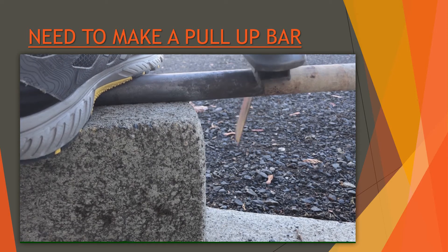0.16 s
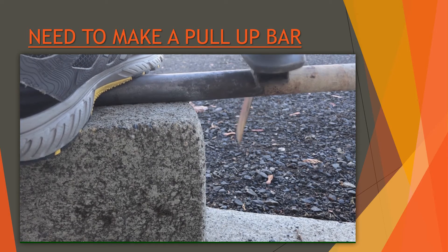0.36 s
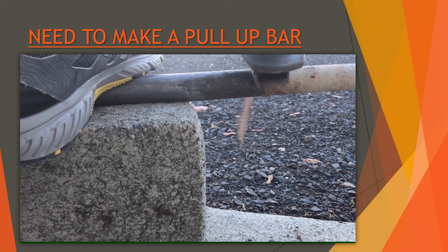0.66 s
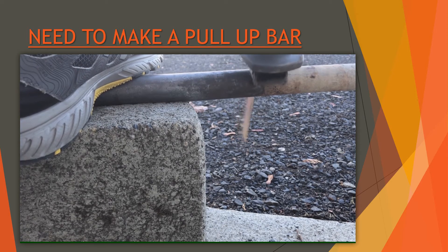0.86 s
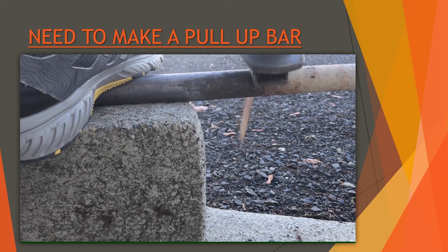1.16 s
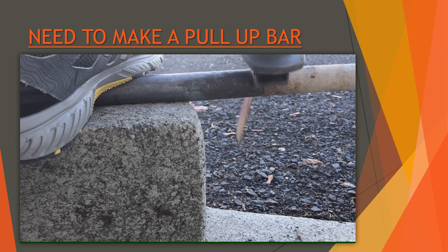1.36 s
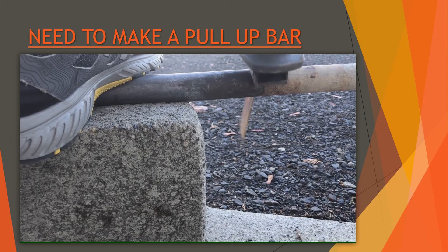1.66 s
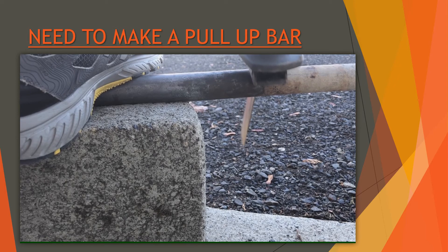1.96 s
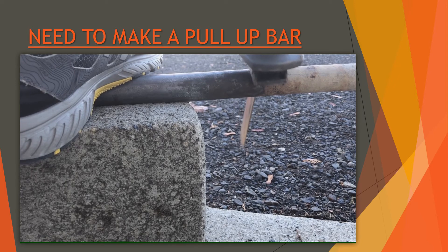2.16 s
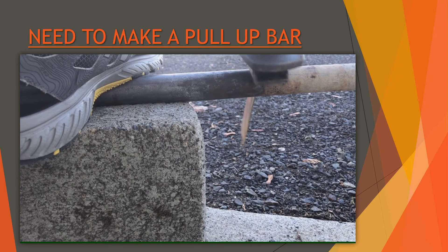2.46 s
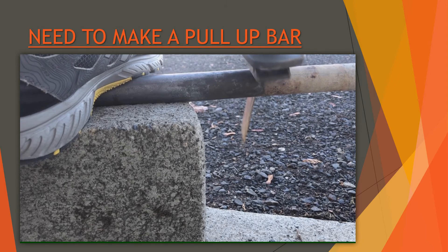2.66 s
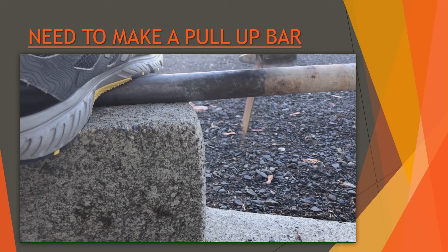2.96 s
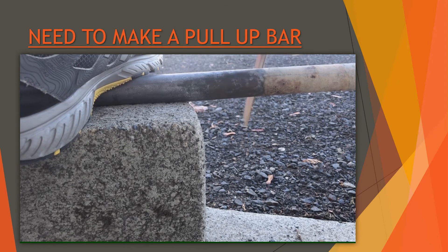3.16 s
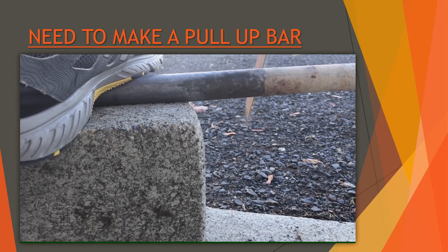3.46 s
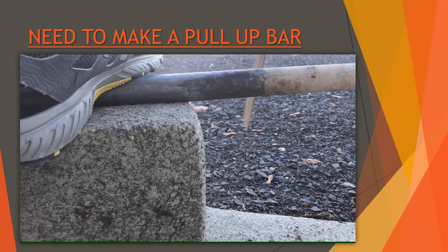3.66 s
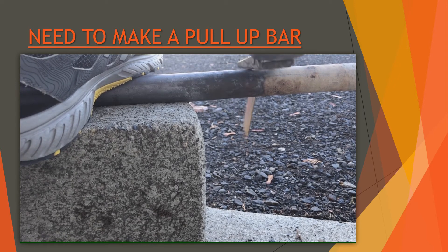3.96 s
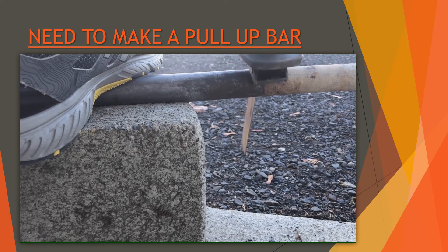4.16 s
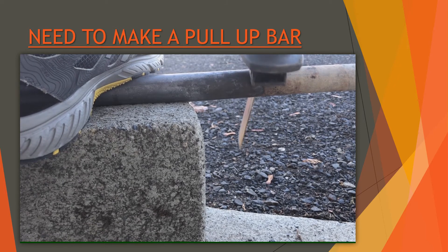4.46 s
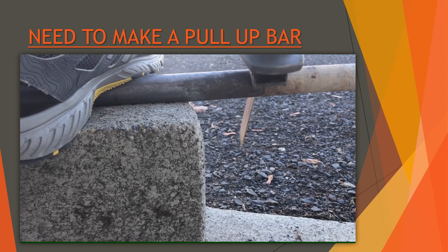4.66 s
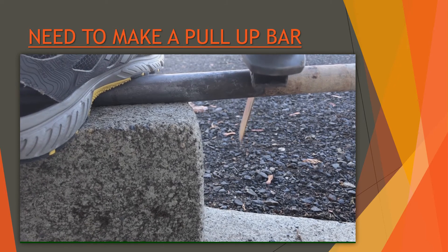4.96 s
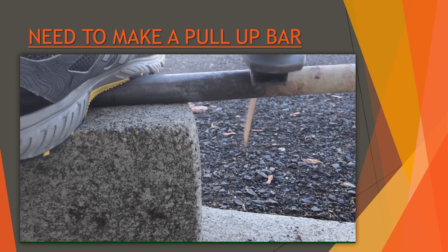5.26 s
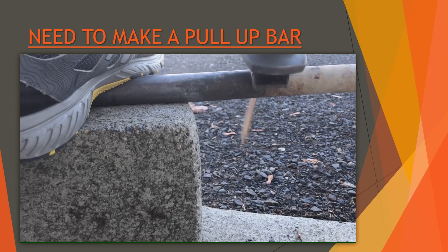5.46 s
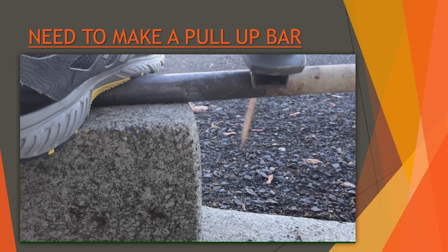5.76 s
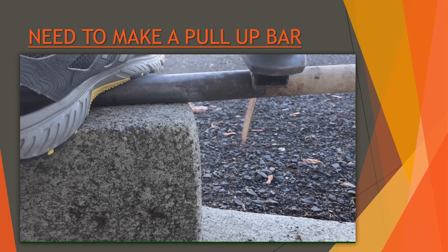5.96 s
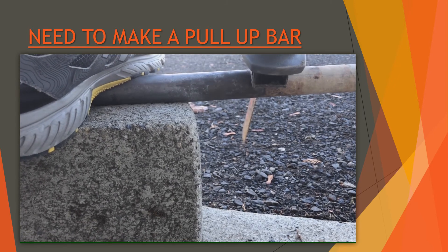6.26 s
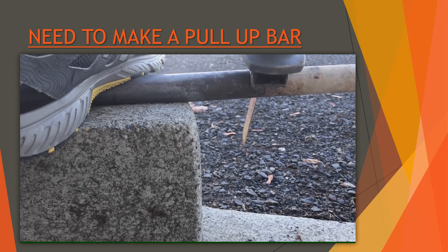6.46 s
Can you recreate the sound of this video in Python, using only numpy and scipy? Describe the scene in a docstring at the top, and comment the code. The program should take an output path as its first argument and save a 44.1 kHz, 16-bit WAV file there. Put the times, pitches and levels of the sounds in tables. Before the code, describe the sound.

A reciprocating saw rasps and clatters through a steel pipe outdoors, squealing at moments, then stops with a few light ticks.

```python
"""Outdoors, a reciprocating saw starts up on a steel pipe held down by a foot on a concrete block.
At about thirty strokes a second its teeth rasp, the drive and shoe clack, and the pipe wall rings.
At moments the noise thins to a few pure tones; now and then the blade squeals, or catches and slams
the shoe on the pipe. It bucks harder as it slows, then stops with a few last ticks.
Small handling rustles and knocks follow, with one clink of the blade on the pipe."""
import sys
import numpy as np
from scipy import signal
from scipy.fft import rfft, irfft
from scipy.io import wavfile
from scipy.ndimage import uniform_filter1d

SR = 44100
rng = np.random.default_rng(int(sys.argv[2]) if len(sys.argv) > 2 else 0)


def wav_record(signal):
    """Record a signal, one row per channel, as 16-bit PCM in the file named by sys.argv[1]."""
    frames = np.transpose(np.atleast_2d(signal))
    bounded = np.clip(frames, -1, 1)
    # unit amplitude maps onto the largest positive 16-bit level
    quanta = np.round(bounded * 32767).astype(np.int16)
    wavfile.write(sys.argv[1], SR, quanta)


N = 291501
TIME = np.arange(N) / SR
FREE_SPEED, WORKING_SPEED = 29.8, 16.2   # strokes per s: the blade bucks below one, weakens below the other


def from_db(db):
    """Decibels to gain."""
    return 10 ** (np.asarray(db) / 20)


def automation(rows):
    """Each column of a breakpoint curve at every sample."""
    times, *columns = np.transpose(rows)
    return [np.interp(TIME, times, column) for column in columns]


def levelled(x, window=6000):
    """Ride the running rms toward 1, leaving the single strokes alone."""
    power = np.maximum(uniform_filter1d(x * x, window), 0)
    return x / np.sqrt(power + 0.00089 * np.mean(x * x))


def eq(x, curve, size=8192):
    """Minimum-phase filter that follows an EQ curve."""
    hz, db = np.transpose(curve)
    grid = np.maximum(np.fft.rfftfreq(size, 1 / SR), 1)
    cepstrum = irfft(np.log(from_db(np.interp(np.log(grid), np.log(hz), db))))
    cepstrum[1:size // 2] *= 2
    cepstrum[size // 2 + 1:] = 0
    return signal.fftconvolve(x, irfft(np.exp(rfft(cepstrum))))[:N]


def resonance(x, hz, width_hz):
    """Two-pole band-pass with unity gain at its peak."""
    r = np.exp(-np.pi * width_hz / SR)
    poles = [1, -2 * r * np.cos(2 * np.pi * hz / SR), r * r]
    return signal.lfilter(np.array([1, 0, -1]) * (1 - r * r) / 2, poles, x)


def clicks(times, gains):
    """One impulse at each time."""
    return np.bincount(np.clip(np.ravel(times) * SR, 0, N - 1).astype(int), np.ravel(gains), N)


def crunch(hits, decay_s):
    """Each hit becomes a dying burst of tiny contacts."""
    envelope = signal.lfilter([1], [1, -np.exp(-1 / (decay_s * SR))], hits + 1e-18)
    return envelope * rng.standard_normal(N)


def wander(per_s):
    """Slow random modulation with a spread of about 1."""
    knots = np.clip(rng.standard_normal(int(TIME[-1] * per_s) + 2), -2, 2)
    return np.interp(TIME * per_s, np.arange(len(knots)), knots) * np.sqrt(3 / 2)


def swell(centre_s, length_s, db):
    """Bell-shaped fade in and out."""
    return from_db(db) * np.exp(-np.minimum(2 * np.abs(TIME - centre_s) / length_s, 10) ** 2)


# Tone of the open air: freq_hz, gain_db
AIR_EQ = [(25, -18), (55, -7), (110, -1.5), (400, -16), (1200, -21), (3000, -27), (6000, -31), (15500, -37)]
def outdoor_air():
    """A faint, steady bed of low noise."""
    return from_db(-66) * levelled(eq(rng.standard_normal(N), AIR_EQ))


def bite(stroke, speed, accent_db, centre, rise_s, fall_s):
    """Blade pressure: the teeth catch abruptly, pull through the steel, and slide lightly back."""
    offset_s = ((stroke - centre + .5) % 1 - .5) / speed
    pull = np.where(offset_s < 0, np.exp(-(offset_s / rise_s) ** 4), np.exp(-(offset_s / fall_s) ** 2))
    depth_db = accent_db + 1.5 * np.sqrt(np.maximum(FREE_SPEED - speed, 0))   # bucks harder when slow
    return from_db(depth_db * (pull - 1))


# Hits of drive and shoe in each stroke, from mid-cut: offset_strokes, clack_db, thump_db
STROKE_HITS = [(-.39, 5, -8.5), (-.18, -8.5, 1), (-.07, -1.5, -17), (.14, -3.5, -5), (0.329, -0.5, -1.5)]
def contacts(stroke, layer, spread_db, jitter=.02):
    """The same contacts come round in each stroke, never quite alike in time or strength."""
    offsets, clack_db, thump_db = np.transpose(STROKE_HITS)
    levels_db = {"clack": clack_db, "thump": thump_db}[layer]
    counts = np.arange(int(stroke[-1]) + 1)[:, None]
    chance = rng.standard_normal((len(counts), 2, len(offsets)))
    places = counts + offsets + jitter * chance[:, 0]
    inside = (places > stroke[0]) & (places < stroke[-1])
    return clicks(np.interp(places, stroke, TIME), inside * from_db(levels_db + spread_db * chance[:, 1]))


def scraping(per_s, size_db, judder_hz, judder_db):
    """Tiny catches of uneven size, coming in clumps as the surfaces judder."""
    sizes = from_db(size_db * np.minimum(rng.exponential(1, N), 4)) * rng.choice([-1, 1], N)
    grains = sizes * (rng.random(N) < per_s / SR)
    judder = resonance(rng.standard_normal(N), judder_hz, judder_hz)
    return grains * from_db(judder_db * np.clip(judder / judder.std(), -2, 2))


# Tone of teeth on steel: freq_hz, gain_db
RASP_EQ = [(400, -36.5), (900, 4), (2000, -1), (2450, 3.5), (2800, 2), (3700, 0.5), (5000, 2), (6200, -1),
           (7300, 0), (8600, 0.5), (10100, -4), (11300, -3.5), (13300, -7.5), (15800, -11.5)]
# The blade's peaks and notches: freq_hz, width_hz, gain_db
BLADE_BANDS = [(3220, 130, -4), (3370, 40, 6), (3700, 220, -3), (3900, 60, 4), (4170, 160, -3),
               (4440, 36, 2.5), (5020, 60, 2), (5300, 170, -7), (5635, 30, 3.5), (5800, 100, -3),
               (6020, 80, 4), (6240, 60, 3), (6720, 60, 3), (7350, 500, -3), (7925, 44, 7), (8080, 100, -4),
               (8850, 80, 2), (9300, 80, 3), (10400, 260, -4), (11000, 90, 3), (11780, 110, 3.5),
               (12380, 160, 3.5)]
def tooth_rasp(grip, scrape, blows):
    """The blows of the drive ride on the scraping teeth, and the blade colours both."""
    rasp = eq(grip * (scrape + from_db(-17) * blows), RASP_EQ)
    for hz, width_hz, db in BLADE_BANDS:
        rasp = rasp + (from_db(db) - 1) * resonance(rasp, hz, width_hz)
    return levelled(rasp)


# Tone of the clacking drive and shoe: freq_hz, gain_db
CLACK_EQ = [(200, -36), (400, -23), (560, -12.5), (670, -1), (800, -2), (1060, 3), (1270, 5.5), (1450, 1),
            (1700, -4), (2100, -0.5), (2500, -14), (4000, -10), (10000, -54)]
def drive_clatter(pressure, blows):
    """Drive and shoe clack and rattle, hardest on the pull."""
    rattle = levelled(scraping(per_s=9000, size_db=2.5, judder_hz=220, judder_db=3))
    return levelled(eq(pressure * (blows + rattle), CLACK_EQ))


def tooth_strikes(stroke, offset=-.09, scatter=.03, level_db=27, spread_db=1.5):
    """The first tooth of each pull strikes the wall, pushing or pulling it."""
    counts = np.arange(1, int(stroke[-1]))
    timing, force, side = rng.standard_normal((len(counts), 3)).T
    times = np.interp(counts + offset + scatter * timing, stroke, TIME)
    return clicks(times, np.sign(side) * from_db(level_db + spread_db * force))


# Modes of pipe wall and blade under the teeth: pitch_hz, width_hz, level_db, lag_strokes
PIPE_MODES = [(483, 42, -6, .35), (930, 26, 3, 0), (1075, 45, 2, .05), (1170, 45, -1.5, 0),
              (1285, 32, 5, 0), (1807, 28, .5, .14), (2030, 70, -3.5, .2), (2210, 90, -5.5, .15),
              (2450, 50, -14, .1), (2755, 100, -10, 0), (2965, 100, -4, 0), (3070, 80, -8, 0),
              (3378, 38, 1, -.04), (3440, 60, -8, -.04), (4435, 30, -10, 0), (5150, 50, -13, 0),
              (5630, 28, -5, 0), (6035, 90, -12, 0), (6879, 26, -9.5, 0), (7935, 36, -11, 0),
              (8520, 60, -15, 0), (9270, 60, -17, 0), (10714, 60, -15, 0), (11000, 60, -16, 0),
              (12300, 80, -19, 0)]
def pipe_ring(stroke, pressure, scrape, detune=.002, flare_db=2.4, flares_per_s=9, attack_s=.0005):
    """Struck and rubbed modes flare, fade and bend in pitch as the teeth move round the wall."""
    ring = 0
    attack = np.exp(-1 / (attack_s * SR))
    for hz, width_hz, db, lag in PIPE_MODES:
        drive = np.interp(stroke - lag, stroke, pressure) * scrape + tooth_strikes(stroke - lag)
        phase = 2 * np.pi * hz * np.cumsum(1 + detune * wander(flares_per_s)) / SR
        carrier = np.exp(1j * phase)
        decay = np.exp(-np.pi * width_hz / SR)
        poles = [1, -decay - attack, decay * attack]
        envelope = signal.lfilter([(1 - decay) * (1 - attack)], poles, drive * carrier.conj())
        ring = ring + from_db(db + flare_db * wander(flares_per_s)) * (carrier * envelope).real
    return levelled(ring)


# Tone of the ram's jolts: freq_hz, gain_db
THUMP_EQ = [(25, -47.5), (55, -27.5), (110, -17.5), (130, -26), (150, -4.5), (190, -6), (260, 1),
            (350, -1.5), (480, 4.5), (700, -4), (1200, -28.5), (4000, -47.5)]
def ram_thump(stroke):
    """The heavy ram jolts the saw, most where it turns round."""
    jolts = crunch(contacts(stroke, "thump", spread_db=5), decay_s=.0097)
    return levelled(eq(jolts, THUMP_EQ))


# Hum of the saw body: stroke_harmonic, level_db
SHAKE_HARMONICS = [(2, -65), (3, -57), (4, -59), (5, -48.5), (7, -58)]
def body_shake(stroke, speed):
    """The body shakes at multiples of the stroke rate, harder at speed."""
    hum = sum(np.sqrt(2) * from_db(db) * np.sin(2 * np.pi * (harmonic * stroke + rng.random()))
              for harmonic, db in SHAKE_HARMONICS)
    return speed / FREE_SPEED * hum


# Resonances of the shoe on the pipe: pitch_hz, width_hz, level_db
SHOE_MODES = [(152.8, 6, 6), (233, 140, -5.5), (658, 82, 1), (769, 68, 2), (1567, 270, 1)]
def shoe_rub(pressure, low_cut_hz=125):
    """The shoe rubs on the pipe all through the stroke; it is too small to radiate deep bass."""
    highpass = signal.butter(4, low_cut_hz, "high", fs=SR, output="sos")
    rub = signal.sosfilt(highpass, pressure ** 1.1 * rng.standard_normal(N))
    return levelled(sum(from_db(db) * resonance(rub, hz, width_hz) for hz, width_hz, db in SHOE_MODES))


def motor_gate(release_s, fall_db_per_s, start_s=.0045):
    """Opens as the motor starts, holds, and dies away after the release."""
    return (TIME > start_s) * from_db(-fall_db_per_s * np.clip(TIME - release_s, 0, .5))


# Motor speed, sagging as the blade binds: time_s, strokes_per_s
MOTOR_SPEED = [(0.0, 8.3), (0.19, 14.38), (0.33, 32.75), (0.89, 34.26), (0.99, 32.95), (1.71, 30.35),
               (1.99, 31.51), (2.33, 28.09), (2.48, 30.73), (2.66, 28.77), (2.83, 30.91), (4.04, 32.62),
               (4.41, 28.65), (4.61, 29.73), (5.18, 24.2), (5.33, 28.3), (5.65, 28.95), (5.8, 13.09)]
# Fader moves through the cut: time_s, clatter_db, rasp_db, shoe_db, ring_db, pull_accent_db
CUT_MIX = [(.3, -19.5, -18, -29, -20.5, 6.5), (.85, -20.5, -16, -45.5, -19, 5.5),
           (1.8, -18, -17, -30, -21.5, 6), (2.3, -19, -18.5, -35, -20.5, 6),
           (2.85, -21, -19, -34.5, -19, 7.5), (3.3, -19, -19.5, -44, -20.5, 5),
           (3.75, -20.5, -21, -43.5, -24, 4.5), (4.1, -21.5, -19.5, -37.5, -26, 4.5),
           (4.45, -19.5, -19, -27.5, -25.5, 5), (4.85, -16, -19.5, -28, -30, 6),
           (5.35, -19.5, -19, -26, -31, 3.5), (5.7, -19.5, -16.5, -21.5, -31, 5)]
def saw():
    """The layers of the cut, all locked to the stroke."""
    speed, = automation(MOTOR_SPEED)
    clatter_db, rasp_db, shoe_db, ring_db, accent_db = automation(CUT_MIX)
    stroke = np.cumsum(speed) / SR + .4   # position, counted in strokes
    slow_octaves = np.maximum(np.log2(WORKING_SPEED / speed), 0)
    pressure = bite(stroke, speed, accent_db, centre=-.06, rise_s=.006, fall_s=.0095)
    # the teeth rasp a little longer than the full pull
    grip = bite(stroke, speed, accent_db, centre=-.05, rise_s=.008, fall_s=.0095) ** .9
    blows = levelled(crunch(contacts(stroke, "clack", spread_db=1.5), decay_s=.0031))
    scrape = levelled(scraping(per_s=16000, size_db=1.5, judder_hz=377, judder_db=3.5))
    rasp = from_db(rasp_db - 9 * slow_octaves) * tooth_rasp(grip, scrape, blows)
    clatter = from_db(clatter_db - 8.5 * slow_octaves) * drive_clatter(pressure, blows)
    ring = from_db(ring_db - 14 * slow_octaves) * pipe_ring(stroke, pressure ** 1.55, scrape)
    thump = from_db(-31 + .94 * (rasp_db - rasp_db.mean()) - 2 * slow_octaves) * ram_thump(stroke)
    steadied_db = .21 * (shoe_db - shoe_db.mean())   # the shoe steadies the body
    shake = from_db(-4 - steadied_db) * body_shake(stroke, speed)
    shoe = from_db(shoe_db) * shoe_rub(pressure)
    # the trigger is let go and the drive runs down; the teeth stop biting a moment later
    running = motor_gate(release_s=5.715, fall_db_per_s=255)
    biting = motor_gate(release_s=5.764, fall_db_per_s=1000)
    cutting = biting * (rasp + squeals(stroke, pressure))
    return running * (clatter + ring + cutting + thump + shoe + shake)


# Tone of the yard's echo: freq_hz, gain_db
YARD_EQ = [(60, -13), (300, -17), (1000, -30), (3000, -24), (5000, -33), (15000, -53.5)]
def yard_echo(x, t60_s=.36, predelay_s=.018):
    """A faint, dull scatter from ground and walls."""
    t = TIME[:SR]
    tail = rng.standard_normal(SR) * from_db(-60 * t / t60_s) * (t > predelay_s)
    return eq(signal.fftconvolve(x, tail / np.linalg.norm(tail))[:N], YARD_EQ)


# Brief thinnings of the noise: centre_s, length_s, depth_db, duck_above_hz, lowest_tone_hz, tone_db
TONAL_DIPS = [(0.101, 0.022, 13, 3996, 2400, -33), (0.3, 0.024, 36, 40, 450, -22),
              (0.382, 0.015, 16, 3800, 1600, -24), (.475, .016, 12, 3600, 2000, -24),
              (1.195, .017, 15, 3500, 2900, -26), (1.704, 0.02, 11, 2090, 1600, -24),
              (2.425, 0.02, 12, 2000, 900, -24), (2.621, 0.024, 38, 40, 850, -21.5),
              (3.008, 0.018, 12, 3000, 2000, -23.5), (3.22, 0.015, 6, 3200, 2500, -26),
              (3.303, 0.017, 12, 2500, 1700, -24), (3.84, .018, 16, 2500, 2200, -24),
              (3.979, .017, 12, 1800, 1800, -26), (4.19, .017, 17, 2300, 1700, -26.5),
              (4.234, 0.018, 18, 1400, 1400, -26.5), (4.491, .015, 10, 3500, 3000, -25),
              (4.68, 0.018, 10, 3000, 2200, -23.5), (4.854, 0.023, 38, 40, 850, -19.5),
              (4.912, 0.017, 8, 3500, 2500, -25), (5.069, 0.016, 16, 3600, 2600, -27),
              (5.303, 0.016, 8, 3000, 2000, -25), (5.394, 0.017, 11, 2200, 1800, -23),
              (5.603, .016, 12, 3000, 1800, -25.5)]
def tonal_dips(x, detune=.03, spread_db=4.5, tone_share=.85, fall_db_per_octave=3.8, tone_stretch=2.1):
    """In each dip the noise ducks and a new handful of pure tones sounds near the pipe's modes."""
    out = x.copy()
    mode_hz = np.array(PIPE_MODES)[:, :1]
    for centre_s, length_s, depth_db, duck_above_hz, lowest_hz, tone_db in TONAL_DIPS:
        span = np.abs(TIME - centre_s) < .1
        t = TIME[span] - centre_s
        highpass = signal.butter(3, duck_above_hz, "high", fs=SR, output="sos")
        upper_band = signal.sosfiltfilt(highpass, out[span])
        duck = 1 - from_db(-depth_db * np.exp(-(2 * t / length_s) ** 2))
        bend, level, phase = rng.uniform(-1.13, 1, (3, len(PIPE_MODES), 1))
        hz = mode_hz * (1 + detune * bend)
        sounding = (hz > lowest_hz) & (rng.random(hz.shape) < tone_share)
        rolloff_db = fall_db_per_octave * np.abs(np.log2(hz / 1100))
        gains = sounding * from_db(tone_db + spread_db * level - rolloff_db)
        tones = np.sum(gains * np.sin(2 * np.pi * hz * t + np.pi * phase), axis=0)
        fade = np.exp(-(2 * t / (tone_stretch * length_s)) ** 4)
        out[span] += tones * fade - duck * upper_band
    return out


# Blade singing in the cut: centre_s, length_s, level_db, pitch_hz, width_hz, lag_strokes
SQUEAL_CUES = [(.85, 0.5, -28.5, 10800, 700, -.05), (1.799, 0.36, -36, 1800, 110, .12),
               (2.148, 0.22, -24.5, 3420, 70, -0.014), (2.429, 0.5, -22.5, 1550, 200, 0.037),
               (3.25, 0.3, -22, 1840, 130, 0.081), (3.601, 1.5, -27.5, 8460, 600, -0.015),
               (3.3, 1.2, -34, 5590, 30, 0), (4.35, 0.63, -30, 11600, 550, -0.0049),
               (4.7, 0.36, -24, 3360, 40, -0.016), (5.1, 0.95, -34, 8040, 70, 0),
               (5.38, 0.41, -28.5, 5840, 120, 0.019), (5.501, 0.67, -31.5, 1866, 130, 0.082),
               (5.56, 0.21, -28.5, 3330, 50, 0)]
def squeals(stroke, pressure):
    """Blade and cut edges catch and sing: narrow resonances, each rubbed once a stroke."""
    friction = rng.standard_normal(N)
    out = 0
    for centre_s, length_s, db, hz, width_hz, lag in SQUEAL_CUES:
        rub = np.interp(stroke - lag, stroke, pressure) * friction
        out = out + swell(centre_s, length_s, db) * levelled(resonance(rub, hz, width_hz))
    return out


def sticking(length_s=.011, drop_db=6.5):
    """Gain that hushes the saw as the blade sticks just before each slam."""
    hush = sum(swell(start_s - length_s / 2, length_s, 0) for start_s, _ in SLAM_CUES)
    return from_db(-drop_db * hush)


# Hard blows of the shoe: start_s, level_db
SLAM_CUES = [(1.429, -5), (2.372, -6), (2.412, -4), (4.397, -2), (5.073, 0.5), (5.271, -3), (5.45, -2.5),
             (5.661, -1.5)]
# Tone of a slam: freq_hz, gain_db
SLAM_EQ = [(100, -16), (400, -5), (750, 4), (1250, 10), (2200, -10), (5000, -14.5), (15000, -22.5)]
def slams():
    """The blade catches and the shoe slams on the pipe."""
    times, db = np.transpose(SLAM_CUES)
    return eq(crunch(clicks(times, from_db(db)), decay_s=.0028), SLAM_EQ)


# Ticks and knocks of the tool: start_s, level_db
KNOCK_CUES = [(5.787, -14), (5.802, -19), (5.822, -24), (6.115, -36), (6.129, -44), (6.169, -42),
              (6.209, -52), (6.305, -35), (6.312, -42), (6.328, -41), (6.379, -49), (6.424, -48),
              (6.574, -43.5)]
# Tone of a knock: freq_hz, gain_db
KNOCK_EQ = [(100, -9), (400, -3), (1100, -8), (2200, -9), (4000, -13), (9000, -21), (15000, -25)]
def knocks():
    """The drive gives its last ticks, then the tool knocks lightly as it is handled."""
    times, db = np.transpose(KNOCK_CUES)
    return eq(crunch(clicks(times, from_db(db)), decay_s=.0051), KNOCK_EQ)


# Handling rustles: centre_s, length_s, level_db
RUSTLE_CUES = [(5.97, 0.046, -68), (6.14, 0.054, -62), (6.205, .045, -66), (6.39, .08, -71),
               (6.52, .04, -73.5), (6.6, 0.044, -68)]
# Tone of grit: freq_hz, gain_db
GRIT_EQ = [(200, -5), (1500, -3), (4000, -4), (9000, -2), (15000, -11)]
def rustles():
    """Handling makes faint swells of gritty scraping."""
    grit = scraping(per_s=5600, size_db=5, judder_hz=151.6, judder_db=2)
    return sum(swell(*cue) for cue in RUSTLE_CUES) * levelled(eq(grit, GRIT_EQ))


# Touches of blade on pipe: start_s, level_db
CLINK_CUES = [(6.304, -36), (6.328, -61)]
# Ring of the clink: pitch_hz, level_db, t60_s
CLINK_MODES = [(1812, 1, .13), (1850, -8, .05), (2256, -4, 0.07), (3375, -4, 0.08), (4300, -7, .08),
               (5114, -19, .14), (5453, -14, .08), (6342, -16, .06), (7430, -17, .055), (9550, -20, .04)]
def clink():
    """The blade touches the pipe: a gritty tick and a short, bright ring."""
    times, db = np.transpose(CLINK_CUES)
    touches = clicks(times, from_db(db))
    t = TIME[:SR // 2]
    ring = sum(from_db(level_db - 60 * t / t60_s) * np.sin(2 * np.pi * hz * t)
               for hz, level_db, t60_s in CLINK_MODES)
    tick = eq(crunch(touches, decay_s=.004), GRIT_EQ)
    return from_db(-9) * signal.fftconvolve(touches, ring)[:N] + from_db(-6) * tick


def scene():
    """Saw and handling close by, in still outdoor air."""
    close = rustles() + sticking() * saw() + slams() + knocks() + clink()
    return (outdoor_air() + tonal_dips(close + yard_echo(close)))[None]


def record(dry):
    """Soft-clip the highest peaks and cut the extreme treble."""
    ceiling, knee, cutoff_hz = .72, 6, 15800
    rounded = dry / (1 + np.abs(dry / ceiling) ** knee) ** (1 / knee)
    return signal.sosfilt(signal.ellip(12, .1, 100, cutoff_hz, fs=SR, output="sos"), rounded)


dry = scene()
out = record(dry)
wav_record(out)
```